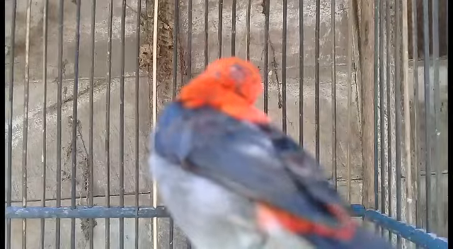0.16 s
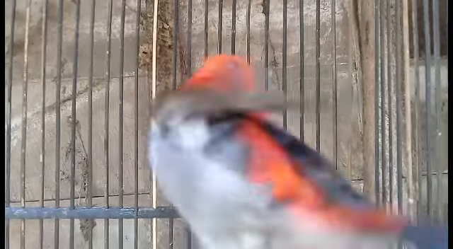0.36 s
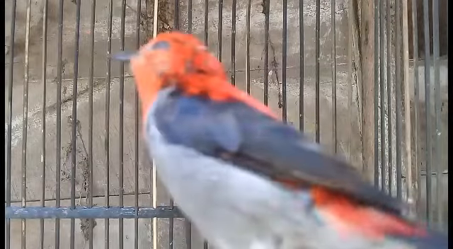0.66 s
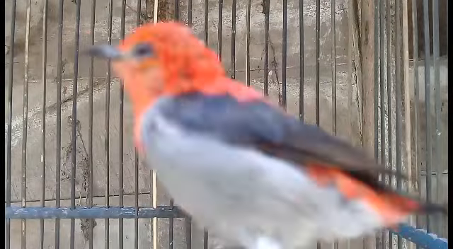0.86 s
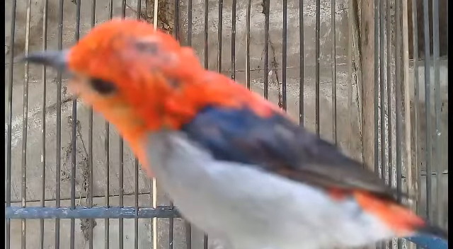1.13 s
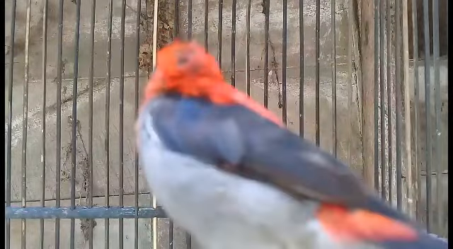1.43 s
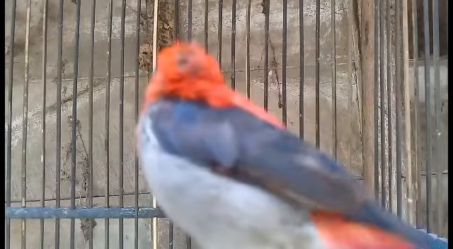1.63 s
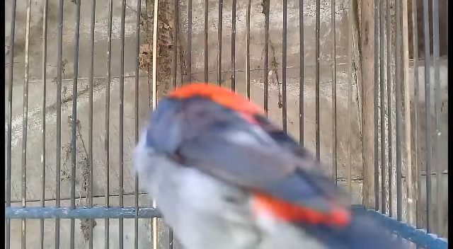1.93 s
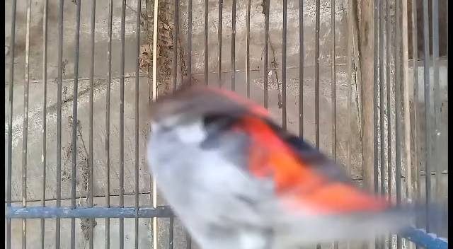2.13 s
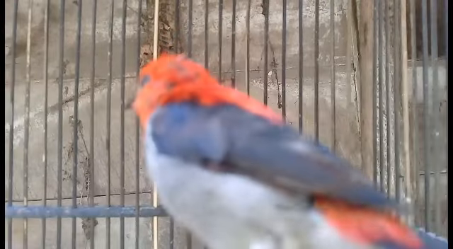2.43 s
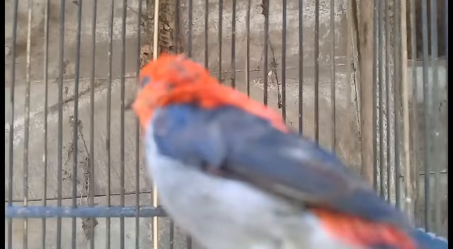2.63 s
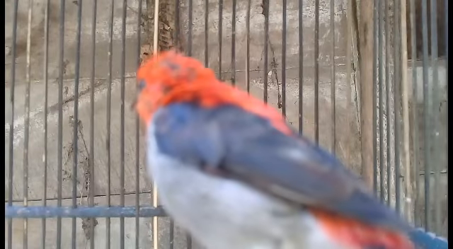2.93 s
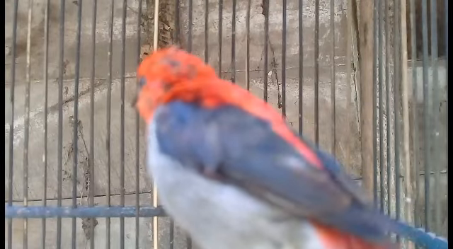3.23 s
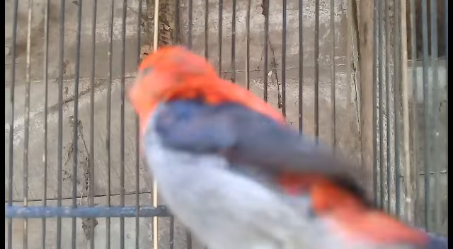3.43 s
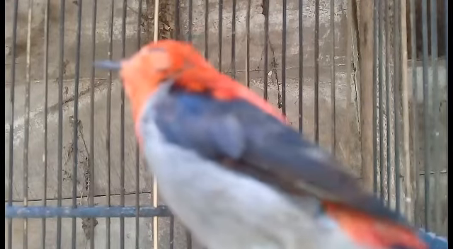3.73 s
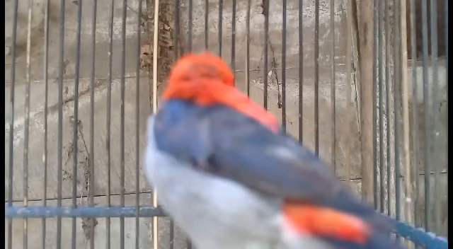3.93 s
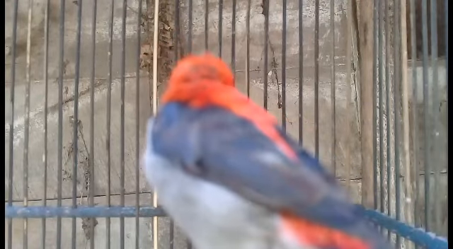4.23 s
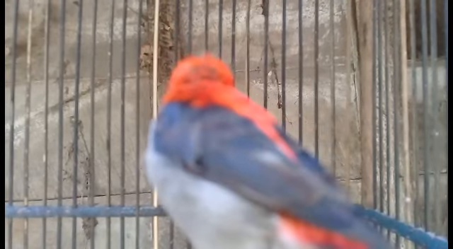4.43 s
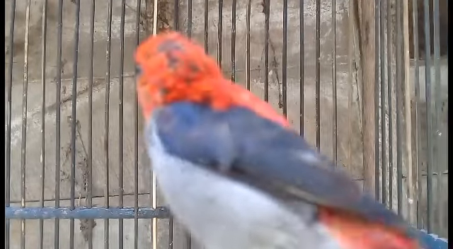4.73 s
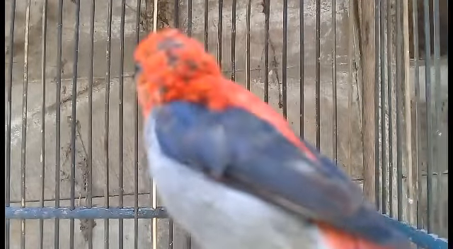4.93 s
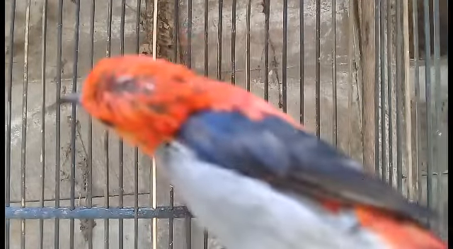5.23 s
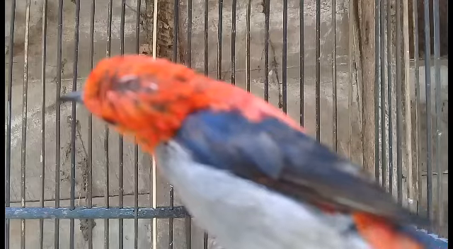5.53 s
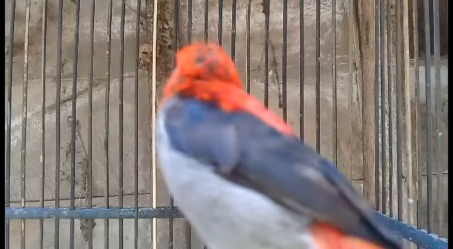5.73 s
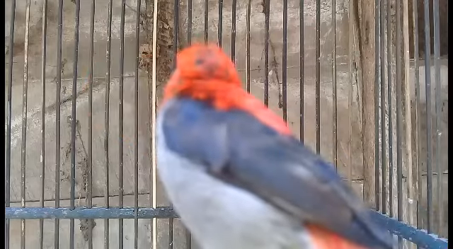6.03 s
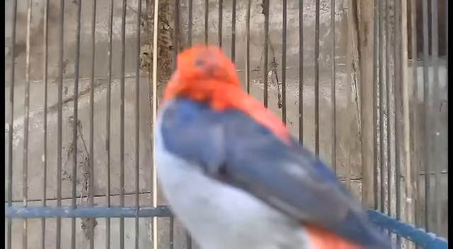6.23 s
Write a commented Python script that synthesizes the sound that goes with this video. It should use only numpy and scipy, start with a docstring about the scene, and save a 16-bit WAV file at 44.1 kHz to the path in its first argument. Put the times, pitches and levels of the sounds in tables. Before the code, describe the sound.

In a small room, a nearby caged bird sings rapid runs of sharp chirps and short, slightly hoarse whistles while a second bird adds thin high trills and slides. After a brief lull the exchange thickens and picks up breathy rasps, then closes with a burst of high notes and one faint whistle. Behind them are a few light wire ticks, steady hiss, low hum and faint far birds.

```python
"""Two birds sing in a small, briefly ringing room, over hiss, a low hum, faint patter and far birds.
The first opens with low whistles and sharp chups; the second answers with thin high slides and trills.
Cage wires tick now and then, and at 1.5 s the second bird draws one long rising whistle.
From 2.5 s the song thickens, breathy rasps join and the hum swells.
Just before 6 s a high flurry ends the exchange, and one faint low whistle follows."""
import sys
import numpy as np
from scipy import signal
from scipy.io import wavfile
from scipy.ndimage import uniform_filter1d

SR = 44100
rng = np.random.default_rng(int(sys.argv[2]) if len(sys.argv) > 2 else 0)


def waveform_to_disk(signal):
    """Save audio, clipped to [-1, 1], as 16-bit WAV at the path in sys.argv[1]."""
    frames = np.transpose(np.atleast_2d(signal))
    scaled = np.clip(frames, -1, 1) * 32767
    samples = np.round(scaled).astype(np.int16)
    wavfile.write(sys.argv[1], SR, samples)


N = 280476

# Spectrum of the hiss: f/Hz, relative density/dB
HISS_SPECTRUM = [(15, -46), (25, -17), (91, -2), (332, -14.5), (766, -0.5), (1390, -2.5), (1670, 2),
                 (2790, -5.5), (4660, -8.5), (7980, -23.5), (14400, -14), (15700, -30)]
# Fader ride of the hum: t/s, level/dB
HUM_RIDE = [(0.0, -71), (2.4, -65.5), (2.85, -57.5), (3.6, -61), (3.9, -59), (6.36, -62.5)]
# Bands of the patter: low f/Hz, high f/Hz, gain/dB
PATTER_BANDS = [(331, 750, -38), (3410, 5860, -38), (5300, 8100, -47.5), (9200, 17000, -56)]
# Where the room thins the far sounds: f/Hz
ROOM_NOTCHES = [1130, 1370, 1573, 1805, 2250, 2740]
# Ticks of the cage wires: t/s, gain/dB
WIRE_TICKS = [(0.655, -32), (0.698, -39), (1.951, -36), (2.8853, -42), (3.1991, -32)]
# Harsh, breathy notes: t/s, length/ms, low f/Hz, high f/Hz, level/dB
RASP_NOTES = [(2.716, 34, 1900, 2870, -36.5), (2.912, 42, 1350, 2100, -31), (3.64, 37, 1440, 2600, -35.5),
              (4.281, 18.6, 980, 4560, -26), (4.4, 200, 1070, 3519, -44.5), (5.18, 66, 4900, 8000, -44.5),
              (5.204, 42, 1060, 3500, -29), (5.873, 22, 1420, 2140, -34)]
# High bird's trills: t/s, length/ms, swoop/ms, low f/Hz, high f/Hz, lower voice/dB, upper voice/dB
HIGH_TRILLS = [(0.259, 17, 9.4, 3900, 6200, -41, -58), (0.376, 41, 8.5, 4580, 6110, -42.5, -42.5),
               (.490, 29, 8.5, 4920, 6480, -51, -43), (5.029, 37, 15, 4520, 7130, -45, -40.5),
               (5.742, 23, 9.9, 3070, 6090, -33.5, -39)]
# High bird's slides: t/s, rise/ms, fall/ms, start f/Hz, turn f/Hz, end f/Hz, level/dB, octave gain/dB
HIGH_SLIDES = [(.275, 17, 7.6, 7160, 7300, 6100, -38, -30), (.277, 8.1, 7, 4700, 5610, 4460, -33, -26),
               (.395, 19, 10, 5460, 5950, 5600, -38, -19), (.394, 4.9, 15, 7700, 7600, 7830, -34, -24),
               (.511, 28, 4.9, 5220, 6220, 6020, -34, -29), (.519, 18, 15, 7840, 8140, 7760, -43, -30),
               (1.978, 3.7, 7.3, 7200, 7460, 7320, -38.5, -13),
               (2.58, 38, 13.5, 4150, 5120, 5800, -42.5, -31), (2.618, 21, 18, 5500, 6900, 6510, -36, -21),
               (2.581, 29, 10, 5790, 6130, 6800, -40, -33), (2.662, 66, 30, 6800, 7450, 7000, -47, -22),
               (2.615, 100, 42, 6600, 7980, 8440, -47.5, -31), (3.322, 5.4, 11, 6840, 7880, 7600, -37, -9),
               (3.333, 15, 24, 7750, 7300, 6800, -34.5, -12), (4.03, 11.3, 8, 6190, 5700, 4680, -31, -41),
               (4.053, 11, 98, 5650, 5450, 5480, -36.5, -47), (4.156, 28, 47, 5600, 6180, 6420, -32, -34),
               (4.213, 20, 11, 6660, 7000, 7400, -41.5, -32),
               (4.396, 2.8, 5.5, 5300, 5220, 4200, -32.5, -28),
               (4.421, 4.2, 5, 4100, 3320, 4400, -36.5, -13), (4.439, 4.9, 7.4, 5250, 5160, 4450, -39, -25),
               (4.453, 12.9, 15, 4670, 5060, 4320, -31.5, -26),
               (4.478, 14.7, 19, 4370, 5010, 4560, -34, -22.5),
               (5.03, 11.7, 30, 6740, 7290, 7090, -32.5, -9.5),
               (5.197, 16, 9.1, 3380, 4820, 4330, -35, -29), (5.218, 5, 15, 4610, 4330, 3080, -43, -27),
               (5.771, 10, 15, 7000, 7240, 6040, -33, -28), (5.771, 11, 6.8, 4540, 5230, 3930, -34.5, -16),
               (5.858, 14, 11, 7160, 7080, 7400, -32.5, -27),
               (5.882, 9.9, 21, 7460, 7630, 7340, -39.5, -25),
               (5.878, 20, 14, 3740, 6300, 5350, -32.5, -34)]
# Path of the high bird's long rising whistle: t/s, f/Hz, level/dB
RISING_WHISTLE = [(1.478, 3054, -45), (1.504, 3104, -39), (1.554, 3320, -37.5), (1.577, 3270, -34.5),
                  (1.606, 3536, -35.5), (1.698, 3596, -34.5), (1.706, 3740, -46), (1.713, 3910, -36),
                  (1.752, 3820, -33), (1.854, 4180, -34), (1.872, 4250, -25.5)]
# Low bird's chups, a lead that breaks into a tail: break t/s, lead/ms, from f/Hz, to f/Hz,
# lead level/dB, tail/ms, from f/Hz, to f/Hz, octave level at the throat resonance/dB
LOW_CHUPS = [(0.187, 10.4, 2350, 3155, -28.5, 10.5, 1840, 1470, -33),
             (0.37, 4.4, 3040, 2830, -39, 13.4, 1170, 1090, -22),
             (0.566, 8.4, 4000, 3020, -21, 23, 2027, 2310, -41),
             (0.748, 4, 1360, 1520, -40, 14, 1480, 1470, -44),
             (.957, 11, 3220, 3587, -23, 27.6, 1497, 1474, -18.5),
             (1.157, 13.3, 2756, 3356, -18, 4.8, 2480, 2240, -38),
             (1.362, 6.5, 3305, 3080, -19, 26.6, 1666, 1316, -22),
             (2.500, 17, 2985, 3456, -21, 28.7, 1980, 1330, -18.5),
             (3.045, 11.5, 3796, 3526, -20.5, 20.5, 2040, 1494, -18),
             (3.240, 12, 3223, 3024, -20, 29, 1786, 1213, -16),
             (3.768, 9.1, 3414, 3136, -18.5, 26.9, 2068, 1358, -15.5),
             (3.978, 10, 2210, 3020, -24.5, 32, 1593, 1106, -20.5),
             (4.286, 4.1, 2170, 1920, -59, 11, 1678, 1500, -19),
             (4.536, 12, 3650, 3300, -19.5, 27, 2093, 1258, -18),
             (4.738, 11.2, 2084, 3180, -25.5, 31.7, 1582, 1140, -20.5),
             (4.996, 5, 2310, 2370, -31, 17, 1693, 1510, -36.5),
             (5.061, 5.4, 1400, 1600, -28.5, 15.4, 1670, 800, -22),
             (5.555, 4.6, 3400, 2800, -23.5, 37, 1750, 1067, -37)]
# Low bird's whistles: t/s, rise/ms, fall/ms, start f/Hz, turn f/Hz, end f/Hz, level/dB
LOW_WHISTLES = [(0.013, 20, 21.3, 2540, 2585, 1568, -34.5), (0.057, 11.4, 5.8, 1590, 1960, 2030, -37.5),
                (0.215, 6.9, 9, 1410, 1830, 1540, -42.5), (0.258, 27, 18, 1690, 2090, 2080, -27.5),
                (0.413, 14.2, 17, 1775, 2410, 2040, -30), (0.457, 8.9, 9.2, 1550, 1695, 1710, -32),
                (0.642, 17, 44, 1620, 2210, 1864, -33.5), (.795, 10.6, 29, 1855, 2420, 2395, -35.5),
                (0.835, 12, 8.8, 1400, 1650, 1690, -29.5), (1.047, 33, 23, 1940, 2154, 2106, -18.5),
                (1.194, 30, 7.1, 2354, 2570, 2420, -35), (1.227, 6.8, 3.1, 2520, 2360, 2180, -27.5),
                (1.235, 11.8, 10.8, 1490, 1875, 1640, -30), (1.458, 7.9, 22, 1710, 1985, 1610, -32),
                (1.482, 19.3, 13.8, 1700, 2145, 1610, -27), (1.581, 5.8, 6.3, 3060, 2300, 1390, -35),
                (1.62, 23, 32, 1850, 2380, 1775, -33), (1.952, 7.3, 9.2, 2200, 2130, 1930, -27.5),
                (1.981, 7.8, 9.5, 2040, 2383, 1950, -25.5), (2, 3.4, 3.7, 1800, 1900, 1870, -24),
                (2.159, 5, 20, 1580, 1750, 1640, -39.5), (2.367, 34, 35, 1190, 2110, 2138, -30.5),
                (2.635, 11.6, 8.3, 3360, 2994, 2830, -16), (2.719, 8.4, 13, 1505, 1403, 910, -38),
                (2.74, 9.7, 9.5, 947, 1960, 1940, -32), (2.881, 18.6, 10.6, 2530, 2400, 2410, -25.5),
                (2.909, 6.4, 45, 2050, 1683, 1590, -39.5), (3.109, 14.3, 27, 1263, 1372, 1770, -35),
                (3.134, 21, 17, 1800, 2146, 1926, -21), (3.327, 13, 8.8, 1916, 2410, 1980, -31),
                (3.362, 3.4, 1.8, 3430, 3100, 2580, -19.5), (3.366, 17.3, 4.9, 2663, 2380, 2380, -13),
                (3.439, 14.3, 6.8, 2830, 3870, 2940, -30), (3.464, 5.4, 15, 2980, 3020, 2790, -30.5),
                (3.485, 5.8, 4.5, 2860, 3540, 3240, -31.5), (3.45, 7.4, 18.7, 2350, 2565, 1620, -27),
                (3.484, 7.8, 19, 1095, 1812, 1850, -34), (3.601, 15.8, 27, 2230, 1948, 1800, -26),
                (3.636, 12, 6.3, 1774, 2364, 1820, -22.5), (3.66, 27.5, 20, 1760, 1507, 1385, -36),
                (3.854, 29, 24, 1234, 1714, 1760, -31), (3.906, 4.7, 8.1, 1740, 1517, 980, -35.5),
                (3.852, 5, 5.5, 2140, 2480, 2250, -28.5), (4.085, 16, 5.6, 2910, 2338, 2130, -21),
                (4.108, 3.5, 22, 2000, 2113, 2010, -33.5), (4.183, 10.3, 6.7, 1970, 2454, 2000, -27),
                (4.185, 11, 20.4, 1007, 1220, 836, -37.5), (4.209, 13.7, 5.9, 1480, 1547, 1550, -29.5),
                (4.341, 15.6, 21, 2210, 1830, 1720, -26.5), (4.374, 9.2, 19.3, 1780, 1982, 1390, -29),
                (4.408, 4.7, 33, 1380, 1636, 1350, -32), (4.428, 6, 38, 1345, 1331, 943, -38.5),
                (4.432, 7.5, 30, 2350, 2412, 2050, -37.5), (4.618, 14.5, 13, 953, 1081, 1060, -36),
                (4.648, 12.4, 18, 1400, 1720, 1480, -24), (4.675, 4.3, 5.9, 1450, 1410, 910, -33.5),
                (4.617, 19.6, 28, 1850, 2290, 2070, -29.5), (4.82, 4.8, 2.7, 920, 1100, 1400, -38.5),
                (4.824, 5.7, 5, 1420, 2060, 2080, -27.5), (4.856, 8.6, 5.6, 3190, 2425, 2240, -17),
                (4.874, 8.2, 17, 1930, 2130, 2050, -31), (4.959, 4.7, 50, 2230, 2502, 2400, -36),
                (4.961, 22.4, 12, 1323, 1250, 900, -39), (4.993, 5.6, 8.6, 1310, 1710, 1500, -32),
                (5.123, 20.5, 15, 1926, 1650, 1550, -25.5), (5.185, 3.6, 16, 1490, 1475, 1720, -31.5),
                (5.209, 6.8, 27, 1695, 1372, 985, -37.5), (5.205, 13.7, 22, 2495, 2384, 2256, -28),
                (5.415, 12, 22, 954, 1006, 1000, -40), (5.446, 17, 12.6, 1062, 1494, 1350, -34.5),
                (5.469, 10, 8.9, 1440, 1346, 814, -38), (6.324, 8.1, 12, 2460, 2390, 2300, -47.5)]


def amp(db):
    """Gain of a level in dB."""
    return 10 ** (np.asarray(db) / 20)


def rms_one(x):
    """Normalise to rms 1."""
    return x / np.sqrt(np.mean(x ** 2) + 1e-20)


def band(x, low_hz, high_hz):
    """Gentle band-pass."""
    sos = signal.butter(2, [low_hz, min(high_hz, .45 * SR)], "band", fs=SR, output="sos")
    return signal.sosfilt(sos, x)


def steep_band(x, low_hz, high_hz):
    """Two band-passes in series."""
    return band(band(x, low_hz, high_hz), low_hz, high_hz)


def drift(rate_hz):
    """Random modulator of rms 1: noise twice through a one-pole low-pass."""
    pole = np.exp(-2 * np.pi * rate_hz / SR)
    return rms_one(signal.lfilter([1], [1, -2 * pole, pole * pole], rng.standard_normal(N + SR))[SR:])


def phase_of(hz):
    """Oscillator phase along a pitch curve."""
    return 2 * np.pi * np.cumsum(hz) / SR


def add(out, start_s, sound):
    """Mix a sound in at its cue."""
    i = max(round(start_s * SR), 0)
    out[i:i + len(sound)] += sound[:N - i]


def hiss(level_db=-47):
    """The bed: half-octave bands of noise, each wandering a little around a slow common swell."""
    out, swell, edges = 0, drift(0.073), 25 * 2 ** np.arange(0, 9.6, .5)
    white = rng.standard_normal((2, N))
    hz, db = np.transpose(HISS_SPECTRUM)
    for k, (low, high) in enumerate(zip(edges, edges[1:])):
        band_db = np.interp(np.log(low * high) / 2, np.log(hz), db)
        out = out + amp(band_db + .5 * swell + 1.8 * drift(14)) * band(white[k % 2], low, high)
    return amp(level_db) * rms_one(out)


def hum():
    """A wavering tone near 88 Hz, with a weaker noise band on either side."""
    s, db = np.transpose(HUM_RIDE)
    tone = np.sin(phase_of(88 + 4 * drift(2.59))) * amp(3.1 * drift(6.7))
    below = 0.34 * rms_one(band(rng.standard_normal(N), 67, 86))
    above = 0.51 * rms_one(band(rng.standard_normal(N), 119, 163))
    return amp(np.interp(np.arange(N) / SR, s, db)) * rms_one(tone + below + above)


def patter(per_s=13, t60_s=.12):
    """Faint noise grains at random moments, triggered separately in each band."""
    out = 0
    for low_hz, high_hz, db in PATTER_BANDS:
        triggers = (rng.random(N) < per_s / SR) * amp(2.5 * rng.exponential(1, N).clip(0, 3))
        decays = signal.lfilter([1], [1, -amp(-60 / (t60_s * SR))], triggers)
        grains = uniform_filter1d(decays, SR // 150) * rng.standard_normal(N)
        out = out + amp(db) * steep_band(grains, low_hz, high_hz)
    return out


def far_birds(count=30, level_db=-45):
    """Faint short glides at random moments and pitches."""
    out, t = np.zeros(N), np.arange(SR // 30) / SR
    for when, pitch, glide, softness in rng.random((count, 4)):
        hz = 1400 * 2.2 ** pitch * (1 + .5 * (glide - .5) * t / t[-1])
        envelope = amp(level_db - 0.6 * softness) * np.hanning(len(t))
        add(out, when * N / SR, envelope * np.sin(phase_of(hz)))
    return out


def far_colour(x, width_hz=78, depth=0.81):
    """The room cuts narrow notches into sound that arrives from afar."""
    for hz in ROOM_NOTCHES:
        x = x - depth * signal.lfilter(*signal.iirpeak(hz, hz / width_hz, SR), x)
    return x


def room(x, t60_s=0.14, wet_db=-9):
    """Small-room reverb: the direct sound and a diffuse tail of dying noise."""
    t = np.arange(SR // 2) / SR
    impulse = rng.standard_normal(len(t)) * amp(-60 * t / t60_s) * np.clip(t / 0.00047, 0, 1)
    impulse = signal.lfilter([1], [1, -0.4], impulse)   # walls swallow some treble
    impulse *= amp(wet_db) / np.sqrt(np.sum(impulse ** 2))
    impulse[0] = 1   # direct sound
    return signal.fftconvolve(x, impulse)[:N]


def cage_ticks(t60_s=0.045):
    """Wires tick: bright, fast-dying noise bursts."""
    out, t = np.zeros(N), np.arange(SR // 8) / SR
    for s, db in WIRE_TICKS:
        add(out, s, amp(db - 60 * t / t60_s) * rng.standard_normal(len(t)))
    return band(out, 1800, 7700)


def rasps(attack_s=0.00086):
    """Harsh notes: breath noise in a steep band, with a hard attack."""
    out, air = np.zeros(N), rng.standard_normal(N)
    for s, length_ms, low_hz, high_hz, db in RASP_NOTES:
        t = np.arange(round(length_ms / 1000 * SR)) / SR
        breath = rms_one(steep_band(air[round(s * SR):][:len(t)], low_hz, high_hz))
        envelope = np.minimum(t / attack_s, 1) * np.sqrt(1 - t / t[-1])
        add(out, s, amp(db) * envelope * breath)
    return out


def contour(times, values, t):
    """Straight ramps, rounded over 3 ms as muscles cannot turn at once."""
    return uniform_filter1d(np.interp(t, times, values), SR // 330, mode="nearest")


def arch_path(note, hush_db, hush_share, fade_db, rounding=0.669):
    """A note's arch as rows of t/s, f/Hz, level/dB; it starts hush_share of the way to hush_db."""
    s, rise_ms, fall_ms, start_hz, turn_hz, end_hz, db = note
    times = s + np.cumsum([0, rise_ms, rise_ms, fall_ms, fall_ms]) / 2 / 1000
    into_hz = start_hz + rounding * (turn_hz - start_hz)
    out_of_hz = end_hz + rounding * (turn_hz - end_hz)
    cut_db = np.interp(times, times[::2], [hush_share * (db - hush_db), 0, fade_db])
    return np.transpose([times, [start_hz, into_hz, turn_hz, out_of_hz, end_hz], db - cut_db])


def whistles(notes, partial_ratio, third_db, edge_s, flutter_db, flutter_hz, rate_hz, hoarse):
    """A near sine with a weak partial and a faint third; airflow makes level and pitch flutter."""
    out, clear_db, raspy_db = np.zeros(N), -12.5, -29
    flutter = amp(flutter_db * np.tanh(drift(rate_hz))) + hoarse * drift(300)
    waver = flutter_hz * drift(rate_hz)
    for path, partial_db in notes:
        s, hz, db = np.transpose(path)
        at = np.arange(round((s[0] - edge_s) * SR), min(round((s[-1] + edge_s) * SR), N))
        t = at / SR
        pitch = contour(s, hz, t)
        unsteady = np.clip((clear_db - db.max()) / (clear_db - raspy_db), .15, 1)   # soft notes shake
        phase = phase_of(pitch + unsteady * waver[at] * (pitch / 7000) ** 2)   # high notes waver most
        tone = np.sin(phase) + amp(partial_db) * np.sin(partial_ratio * phase)
        tone += amp(third_db) * np.sin(3 * phase) * (pitch < 5000)
        fades = np.clip(np.minimum(t - t[0], t[-1] - t) / edge_s, 0, 1) ** 2
        envelope = amp(contour(s, db, t)) * fades * (1 + unsteady * (flutter[at] - 1))
        out[at] += np.sqrt(2) * envelope * tone
    return out


def trills(top_hz=7800):
    """Two voices swoop up and back together, the upper one peaking at top_hz."""
    out = np.zeros(N)
    for s, length_ms, swoop_ms, low_hz, high_hz, lower_db, upper_db in HIGH_TRILLS:
        ms = np.arange(0, length_ms, 1000 / SR)
        arch, swing_hz = np.abs(np.sin(np.pi * ms / swoop_ms)), high_hz - low_hz
        lower = amp(lower_db) * np.sin(phase_of(low_hz + swing_hz * arch))
        phase = phase_of(top_hz - swing_hz * (1 - arch))
        upper = amp(upper_db) * (np.sin(phase) + amp(-21) * np.sin(2 * phase))
        fades = np.clip(np.minimum(ms, length_ms - ms) / 4.7, 0, 1)
        add(out, s, np.sqrt(2) * fades * (lower + upper) * (1.08 + 0.14 * arch))
    return out


def high_bird(sum_gain_db=10):
    """Thin slides, one long whistle and trills; two voices in one throat also sound their sum tones."""
    notes = [(arch_path(note, hush_db=-42.5, hush_share=1, fade_db=4.1), octave_db)
             for *note, octave_db in HIGH_SLIDES]
    notes.append((RISING_WHISTLE, -28))   # its octave sits 28 dB down
    song = whistles(notes, partial_ratio=2, third_db=-36, edge_s=0.0082,
                    flutter_db=3.5, flutter_hz=113, rate_hz=300, hoarse=0.048) + trills()
    return song + amp(sum_gain_db) * steep_band(song ** 2, 9200, 16000)


def chups(throat_hz=3170, throat_width_hz=425):
    """A steady lead breaks in a few ms to a rough, mostly lower tail; the throat lifts its octave."""
    out = np.zeros(N)
    flutter = amp(3.5 * np.tanh(drift(150))) + .32 * np.tanh(drift(500))   # slightly hoarse airflow
    waver_hz = 95 * np.tanh(drift(120))
    for s, lead_ms, start_hz, break_hz, lead_db, tail_ms, tail_hz, end_hz, octave_db in LOW_CHUPS:
        ms = np.arange(-lead_ms, tail_ms, 1000 / SR)   # zero at the break
        at = round((s - lead_ms / 1000) * SR) + np.arange(len(ms))
        bend_hz = end_hz + 0.431 * (tail_hz - end_hz)   # the glide slows towards its end
        hz = contour([-lead_ms, -1.5, 1.2, tail_ms / 2, tail_ms],
                     [start_hz, break_hz, tail_hz, bend_hz, end_hz], ms) + waver_hz[at] * (ms > 0)
        phase = phase_of(hz)
        tail_db = -24.5 + 0.55 * lead_db   # a louder lead leaves a louder tail
        db = np.interp(ms, [-lead_ms, -.4 * lead_ms, -1.5, 4],
                       [lead_db - 8, lead_db, lead_db + 0.5, tail_db])
        resonance = 1 / np.sqrt(1 + ((2 * hz - throat_hz) / throat_width_hz) ** 2)
        octave_gain = amp(octave_db) * resonance * np.clip((ms - .8) / 1.22, 0, 1)
        tone = amp(db) * np.sin(phase) + octave_gain * np.sin(2 * phase)
        fades = np.clip(np.minimum(ms + lead_ms, tail_ms - ms) / 4.4, 0, 1)
        out[at] += np.sqrt(2) * fades * tone * np.where(ms > 0, flutter[at], 1)
    return band(out, 480, 12000)


def low_bird(sub_level_db=-50, sub_from_hz=2000):
    """The lead voice: chups and hoarse whistles, with a faint sub-octave under the higher whistles."""
    notes = []
    for note in LOW_WHISTLES:
        turn_hz, db = note[4], note[6]
        sub_gain_db = min(sub_level_db - db, -10) - 20 * (turn_hz < sub_from_hz)
        notes.append((arch_path(note, hush_db=-48.5, hush_share=0.53, fade_db=2.34), sub_gain_db))
    return whistles(notes, partial_ratio=.5, third_db=-38, edge_s=0.00306,
                    flutter_db=4, flutter_hz=89, rate_hz=58, hoarse=.18) + chups()


def scene():
    """Mono mix: both birds and the cage up front in the room, the far layers and hum behind."""
    near = low_bird() + high_bird() + cage_ticks()
    far = far_colour(room(patter() + far_birds()) + hiss())
    return (room(near + rasps()) + far + hum())[None]


def record(dry):
    """A steep high cut, 70 dB down from 16050 Hz."""
    return signal.sosfilt(signal.cheby2(14, 70, 16050, fs=SR, output="sos"), dry)


dry = scene()
out = record(dry)
waveform_to_disk(out)
```